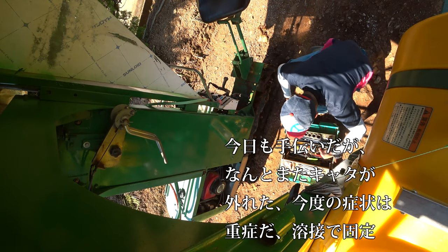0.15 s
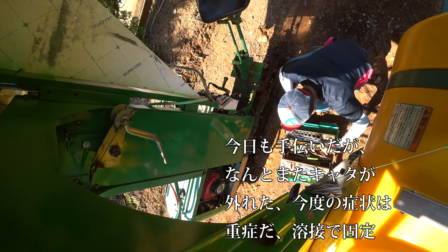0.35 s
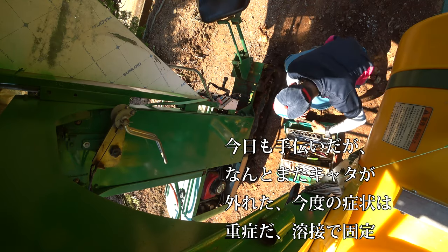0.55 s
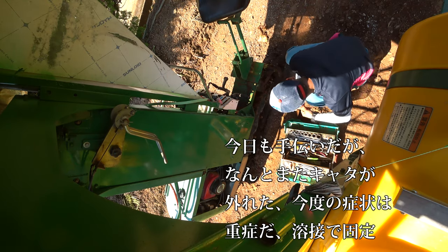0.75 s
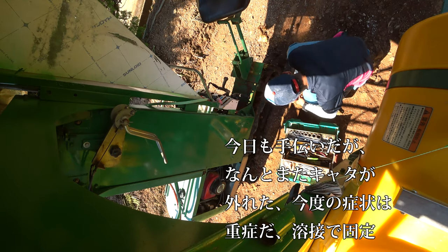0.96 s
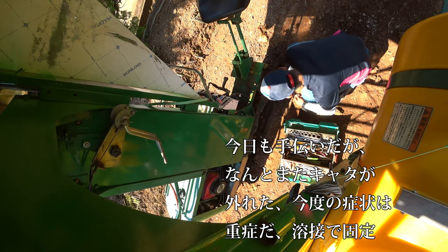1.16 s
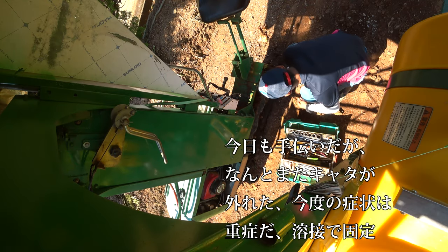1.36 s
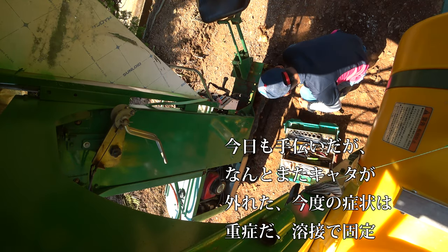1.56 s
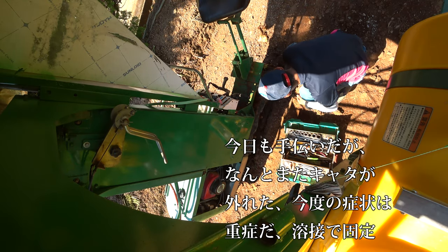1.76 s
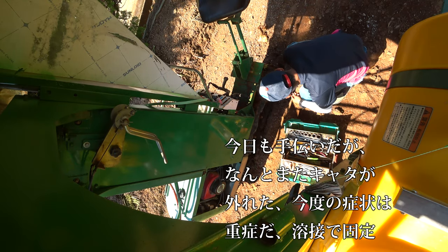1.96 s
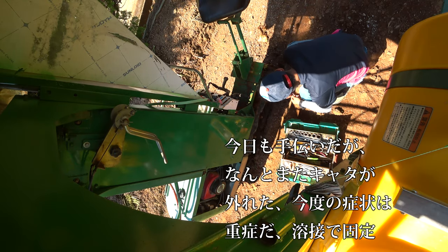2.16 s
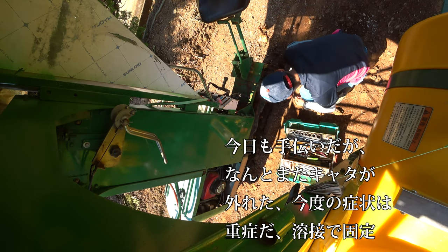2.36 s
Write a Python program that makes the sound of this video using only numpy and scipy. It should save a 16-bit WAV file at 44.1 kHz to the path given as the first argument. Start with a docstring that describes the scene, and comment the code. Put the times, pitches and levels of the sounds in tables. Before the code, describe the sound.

Close up outdoors, a hand stirs wrenches and sockets with quick clinks and a sharp clash, then pauses; cloth brushes softly, a tool bangs the box, and later another knocks it, over faint air and tiny chirps.

```python
"""Rummaging in a steel toolbox

A hand rummages outdoors: wrenches and sockets clink and rattle, two wrenches clash hard, later tools drop
against the box. Between them sleeves rustle over quiet farm air and a few faint chirps.
Struck metal is made of fading sine tones; clatter, cloth and air are shaped noise (clatter adds tiny pings).
"""
import sys
import numpy as np
from scipy import signal
from scipy.fft import rfft, irfft
from scipy.io import wavfile
from scipy.ndimage import uniform_filter1d, minimum_filter1d

SR = 44100
rng = np.random.default_rng(int(sys.argv[2]) if len(sys.argv) > 2 else 0)


def digitize_waveform(pressure):
    """Quantize a signal to 16-bit integers and store it at the path in sys.argv[1].

    Rows of a 2-D input are taken as channels; values are limited to [-1, 1].
    """
    field = np.atleast_2d(pressure).T
    bounded = np.clip(field, -1, 1)
    quanta = np.round(bounded * 32767).astype(np.int16)
    wavfile.write(sys.argv[1], SR, quanta)


N = 110250  # samples, 2.5 s


def undb(db):
    """Turn dB into a gain."""
    return 10 ** (np.asarray(db) / 20)


def table(rows, hz):
    """Read (Hz, value) rows at any pitch, on a log pitch axis."""
    rows = np.array(rows, float)
    return np.interp(np.log(hz + 1), np.log(rows[:, 0] + 1), rows[:, 1])


def unit(x):
    """Scale to an rms of 1."""
    return x / np.sqrt(np.mean(x ** 2))


def coloured(x, rows):
    """Shape the spectrum by (Hz, dB) rows, then scale to an rms of 1."""
    gain = undb(table(rows, np.fft.rfftfreq(N, 1 / SR)))
    return unit(irfft(rfft(x) * gain, N))


def clock(length):
    """Sample times in seconds, from 0 up to a length."""
    return np.arange(int(length * SR)) / SR


def add(out, start, x):
    """Mix x in at a start time in seconds, cutting it at the end of the scene."""
    i = int(start * SR)
    out[i:i + len(x)] += x[:N - i]


def fall(t, t60):
    """Exponential decay that drops 60 dB in t60 seconds."""
    return np.exp(-np.log(1000) * t / t60)


DAMPED_T60_S = 0.028


def touch(t, rise, free):
    """A contact swells, the metal rings, then a neighbour damps it."""
    return np.clip(t / max(rise, 1e-4), 0, 1) * fall(np.maximum(t - free, 0), DAMPED_T60_S)


# Colour of the air. Each row: pitch in Hz, level in dB.
AIR_COLOUR = [(15, -53.5), (25, -20.5), (200, -10.5), (236, -9.5), (591, -4), (677, -2.5), (1560, -3.5),
              (2050, -8.5), (2610, -9.5), (11000, -16), (16000, -16.5)]
# Difference between the ports. Each row: pitch in Hz, side level minus mid level in dB.
AIR_SIDE = [(60, -2.5), (110, -10.5), (200, -2), (380, 2), (700, 4), (1290, 3.5), (2380, 6), (4400, -1),
            (8120, -4.5), (15000, -2.5)]
AIR_DB = -56.5
AIR_FLICKER_DB, AIR_FLICKER_S = 1.5, .03  # rms flicker, and length of each of two smoothings


def air():
    """Quiet outdoor noise, partly shared by both ports; six pitch bands flicker separately."""
    hz, out = np.fft.rfftfreq(N, 1 / SR), 0
    mid, side = rfft(rng.standard_normal((2, N))) * undb(table(AIR_COLOUR, hz))
    side = side * undb(table(AIR_SIDE, hz))
    ports = np.array([mid + side, mid - side])
    # band 0 is all below 500 Hz, bands 1 to 4 are octaves, band 5 is all above 8000 Hz
    band = np.clip(np.floor(np.log2(hz / 250 + 1e-9)), 0, 5)
    size = int(AIR_FLICKER_S * SR)
    for k in range(6):
        slow = uniform_filter1d(uniform_filter1d(rng.standard_normal(N), size), size)
        out = out + irfft(ports * (band == k), N) * undb(AIR_FLICKER_DB * unit(slow))
    return out * undb(AIR_DB) / np.std(out.mean(axis=0))


# Each row: start in seconds, first pitch in Hz, last pitch in Hz, level in dB, length in seconds.
CHIRPS = [(0.548, 2073, 2250, -58, 0.037), (0.745, 1986, 1944, -57, 0.022), (0.868, 2200, 1926, -54, 0.041),
          (1.012, 2030, 1860, -58, 0.035), (1.371, 3950, 4760, -50, 0.023), (1.386, 4530, 3650, -54, 0.016),
          (1.932, 3580, 4800, -55.5, 0.016)]


def chirps():
    """Faint gliding tones, broken up by a fast random flicker of level."""
    out = np.zeros(N)
    for start, first_hz, last_hz, level_db, length in CHIRPS:
        n = int(length * SR)
        cycles = np.cumsum(np.linspace(first_hz, last_hz, n)) / SR
        add(out, start, undb(level_db) * np.hanning(n) ** .5 * np.sin(2 * np.pi * cycles))
    flicker_db = 4.4 * unit(uniform_filter1d(rng.standard_normal(N), size=130))
    return out * undb(flicker_db)


# Brushes of cloth. Each row: middle in seconds, level in dB, length in seconds.
RUSTLE = [(.87, -59, 0.13), (1.141, -55, 0.15), (1.21, -55, .14), (1.33, -57.5, 0.067), (1.854, -55, 0.062),
          (1.928, -58, 0.069), (2.04, -58.5, 0.043), (2.287, -55.5, 0.025), (2.477, -61.5, 0.076)]
RUSTLE_HZ, RUSTLE_WIDTH_HZ = 3320, 4200  # centre and width of the filter, which is used twice


def rustle():
    """Sleeves brushing: grainy noise in a broad band, swelling and fading smoothly."""
    grain_db = 1.9 * unit(uniform_filter1d(rng.standard_normal(N), 150))
    grains = rng.standard_normal((2, N)) * undb(grain_db)
    b, a = signal.iirpeak(RUSTLE_HZ, RUSTLE_HZ / RUSTLE_WIDTH_HZ, SR)
    cloth = unit(signal.lfilter(b, a, signal.lfilter(b, a, grains)))
    t, power = np.arange(N) / SR, np.zeros(N)
    for middle, level_db, length in RUSTLE:
        power += undb(2 * level_db) * np.exp(-(2 * (t - middle) / length) ** 2)
    return cloth * np.sqrt(power)


# Low thumps under the hard clash and under a later blow. Each row: start in seconds, level in dB.
THUMPS = [(0.31, -59.5), (.350, -51), (1.42, -62)]
THUMP_HZ, THUMP_T60_S = 150, 0.067  # top of the noise band, decay time


def thumps():
    """Short dull bursts of bass noise, partly different at the two ports."""
    env, t = np.zeros(N), clock(.15)
    for start, level_db in THUMPS:
        add(env, start, undb(level_db) * np.minimum(t / 0.00818, 1) * fall(t, THUMP_T60_S))
    bass = signal.butter(2, [THUMP_HZ / 4, THUMP_HZ], "band", fs=SR, output="sos")
    mid, side = signal.sosfilt(bass, rng.standard_normal((2, N)))
    return unit(np.array([mid + .5 * side, mid - .5 * side])) * env


STRIKE_SCATTER_DB = 2


def struck(mode_hz, modes, hits):
    """Each strike wakes the same modes (ringing tones), nearly in step, with fresh strengths."""
    out, hz = np.zeros(N), np.array(mode_hz)[:, None]
    mode_db, t60 = np.array(modes, float).T[:, :, None]
    for start, level_db, rise, free, tilt in hits:
        t = clock(free + .05)
        chance = rng.standard_normal((2, len(hz), 1))
        tilt_db = tilt * np.log2(hz / hz[0])
        gain = undb(level_db + mode_db + tilt_db + STRIKE_SCATTER_DB * chance[0])
        # counting phase from the scene's start keeps strikes in step, give or take .5 radian
        phase = 2 * np.pi * hz * (t + int(start * SR) / SR) + .5 * chance[1]
        ringing = (gain * fall(t, t60) * np.sin(phase)).sum(axis=0)
        add(out, start, touch(t, rise, free) * ringing)
    return out


# Ringing tones of the box: pitches in Hz.
BOX_HZ = [516, 625, 730, 816, 900, 1000, 1140, 1230, 1435, 1700, 2150, 2850, 3290, 3650, 4070, 4334, 5050]
# Each row, in the order of the pitches: level in dB, time to fall 60 dB in seconds.
BOX_MODES = [(-10, 0.12), (-11.5, 0.13), (-10.5, 0.18), (-25.5, 0.82), (-13.5, 0.12), (-15.5, 0.055),
             (-17, 0.097), (-18.5, .1), (-15.5, 0.15), (-14.5, 0.11), (-24.5, 0.13), (-12, 0.069),
             (-16.5, 0.033), (-10, 0.0377), (-13.5, 0.089), (-16, .1), (-19.5, 0.077)]
# Each row: start in seconds, level in dB, rise in seconds, free ringing in seconds, tilt in dB per octave.
BOX_HITS = [(0.015, -28, 0.0068, 0.063, -26), (0.045, -27.5, 0.0005, .2, -3),
            (0.072, -31.5, 0.00061, 0.2316, 3.5), (.095, -30, 0.00072, 0.25, 1.5),
            (0.144, -48, 0.01, 0.203, 10), (.172, -30.5, 0.00085, 0.15, 1), (.205, -36, 0.00061, 0.41, 2.5),
            (0.224, -30, 0.0028, 0.1864, 1), (0.25, -27.5, 0.00058, 0.062, 0),
            (0.269, -24.5, 0.00093, 0.03, 1.5), (0.312, -36, 0.0075, 0.027, -7.5),
            (0.362, -34, 0.0029, 0.031, 7), (0.376, -37.5, 0.0012, 0.027, -2),
            (0.402, -35, 0.0024, 0.095, 3.5), (1.392, -18, 0.0011, 0.025, 0.5),
            (1.423, -16, 0.0011, 0.32, -4), (1.433, -30, 0.0016, 0.25, -2.5),
            (1.743, -48, 0.0017, 0.072, -6), (2.206, -36, 0.00063, 0.034, -2),
            (2.352, -26, 0.00091, 0.017, 2.5), (2.375, -23.5, 0.00071, .3, -1.5),
            (2.443, -39.5, 0.0041, 0.075, -4.5)]


def box_ringing():
    """The steel box sounds its separate modes at each blow."""
    return struck(BOX_HZ, BOX_MODES, BOX_HITS)


# Colour of the noise of a blow on the box. Each row: pitch in Hz, level in dB.
CRACK_COLOUR = [(120, -57), (200, -16.5), (424, -22.5), (500, -9.5), (647, 1.5), (1450, -9), (2510, -23),
                (2750, -12.5), (3560, -9.5), (4770, -19), (16000, -50.5)]
CRACK_DB, CRACK_SPLIT_HZ = -2.5, 2600
CRACK_LOW_T60_S, CRACK_HIGH_T60_S = .12, 0.098


def cracks():
    """The panels' many close modes: a coloured noise tail after each blow, the treble dying first."""
    low_power, high_power, t = np.zeros(N), np.zeros(N), clock(.3)
    noise = coloured(rng.standard_normal(N), CRACK_COLOUR)
    low = signal.sosfiltfilt(signal.butter(4, CRACK_SPLIT_HZ, fs=SR, output="sos"), noise)
    for start, level_db, rise, free, tilt in BOX_HITS:
        contact = undb(level_db) * touch(t, rise, free)
        add(low_power, start, (contact * fall(t, CRACK_LOW_T60_S)) ** 2)
        add(high_power, start, (contact * undb(1.7 * tilt) * fall(t, CRACK_HIGH_T60_S)) ** 2)
    return undb(CRACK_DB) * (low * np.sqrt(low_power) + (noise - low) * np.sqrt(high_power))


# Bursts of clatter in the heap. Each row: start in seconds, level in dB, rise in seconds, length in seconds.
RATTLE = [(0, -35.5, 0.00033, 0.012), (0.0106, -35, 0.0005, 0.0096), (0.026, -36.5, .001, .016),
          (0.04, -38, 0.0062, 0.048), (0.076, -25.5, 0.0032, 0.0043), (0.087, -27.5, 0.00067, 0.0062),
          (0.104, -43, .002, 0.029), (0.139, -35.5, 0.002, 0.022), (0.162, -32.5, 0.0052, 0.014),
          (0.185, -32, 0.00179, 0.011), (0.197, -33.5, 0.0049, .014), (0.214, -27.5, .006, .015),
          (0.237, -32.5, 0.0031, 0.009), (0.25, -31, 0.0013, 0.02), (0.27, -27, .003, 0.0046),
          (0.278, -40.5, 0.0028, 0.03), (0.309, -29, .001, 0.0066), (0.313, -40.5, 0.0026, 0.0097),
          (0.333, -38, 0.0023, 0.017), (0.346, -30, .002, 0.0058), (0.357, -20.5, 0.0011, 0.0064),
          (0.371, -30, 0.0014, 0.017), (0.396, -35, 0.0011, 0.011), (0.412, -53, .001, 0.018)]
# Colour of the clatter. Each row: pitch in Hz, level in dB.
RATTLE_COLOUR = [(180, -49), (300, -12.5), (774, 3), (1840, -5.5), (2170, 0), (3290, -6), (4230, -1),
                 (6200, 2.5), (7570, -5.5), (10600, -4), (16000, -17)]
PINGS_PER_S, PING_T60_S, PING_DB = 4500, .035, 4  # level is that of the pings over the clicks
RATTLE_SIZES_DB = 2.5  # sets the random boosts that make contacts uneven


def rattle():
    """A dense swarm of tiny contacts: uneven clicks, and short random modes that they ring."""
    pings, t, end = np.zeros(N), clock(PING_T60_S), .5
    for when, pitch, size in rng.random((8000, 3)):
        start = when * 8000 / PINGS_PER_S
        if start < end:
            gain = undb(-RATTLE_SIZES_DB * np.log(1 - size))
            tone = np.sin(2 * np.pi * (300 + 15500 * pitch) * t)
            add(pings, start, gain * fall(t, PING_T60_S) * tone)
    boost_db = RATTLE_SIZES_DB * np.minimum(rng.exponential(size=N), 4)
    clicks = rng.standard_normal(N) * undb(boost_db)
    power = np.zeros(N)
    for start, level_db, rise, length in RATTLE:
        add(power, start, (undb(level_db) * touch(clock(length + .05), rise, length)) ** 2)
    swarm = undb(PING_DB) * pings / np.std(pings[:int(end * SR)]) + unit(clicks)
    return coloured(swarm, RATTLE_COLOUR) * np.sqrt(power)


# Single short tones. Each row: start in seconds, pitch in Hz, level in dB, free ringing in seconds.
TINKS = [(.013, 7700, -23.5, 0.0082), (.041, 5490, -26.5, 0.022), (.045, 6830, -23.5, 0.023),
         (.077, 4390, -25.5, 0.014), (.171, 3067, -29.5, 0.032), (.180, 4520, -33, 0.018),
         (.194, 10800, -34, 0.011), (.205, 8300, -26, 0.018), (.220, 4330, -22, 0.0099),
         (.221, 6300, -22.5, 0.0075), (.254, 6100, -24, 0.0067), (.268, 6310, -27, 0.0071),
         (.269, 8100, -26.5, .005), (2.063, 4306, -50.5, 0.083), (.46, 1420, -55, 0.066),
         (.675, 4480, -57.5, 0.0088), (1.16, 1145, -50, 0.017), (2.206, 4290, -49, 0.027),
         (2.206, 2155, -43.5, 0.029), (2.206, 1682, -39, 0.012), (2.351, 945, -19, 0.004),
         (1.393, 1702, -33, 0.012), (1.424, 1182, -25, .016), (1.424, 621, -26.5, 0.026),
         (1.429, 303, -39.5, 0.055), (2.206, 5120, -53.5, .02), (2.206, 620.5, -44.5, 0.044),
         (2.351, 1170, -23, 0.019), (2.351, 3303, -22.5, 0.007), (1.393, 615, -18.5, 0.023),
         (.319, 3870, -16, 0.005), (.143, 2248, -24, .018), (.268, 979, -21, 0.0088),
         (2.445, 2195, -48.5, 0.016)]
TINK_T60_S = 0.08  # shortest decay time before damping


def tinks():
    """Single short sine tones: small clinks, faint ticks, and extra tones of blows on the box."""
    out = np.zeros(N)
    for start, hz, level_db, free in TINKS:
        t = clock(free + .05)
        tone = fall(t, max(TINK_T60_S, 4 * free)) * np.sin(2 * np.pi * hz * t)
        add(out, start, undb(level_db) * touch(t, 0.0011, free) * tone)
    return out


# Ringing tones of a big socket: pitches in Hz.
SOCKET_HZ = [2170, 2573, 4113, 4344, 6783, 8500, 9313, 10790]
# Each row, in the order of the pitches: level in dB, time to fall 60 dB in seconds.
SOCKET_MODES = [(-0.5, 0.074), (-11, 0.12), (-5, 0.101), (-3.5, .03), (8, .06), (-13.5, 0.037),
                (-2.5, 0.054), (2.5, .11)]
# Each row: start in seconds, level in dB, rise in seconds, free ringing in seconds, tilt in dB per octave.
SOCKET_HITS = [(0.141, -25, 0.0016, 0.072, -3), (0.214, -28, .002, 0.027, 0)]


def big_socket():
    """A big socket rings its own modes when knocked."""
    return struck(SOCKET_HZ, SOCKET_MODES, SOCKET_HITS)


# Ringing tones of the long and the short wrench: pitches in Hz.
LONG_HZ = [3770, 6300, 6445, 6560, 9995, 10100, 10760, 11620, 12990, 14710, 15470]
SHORT_HZ = [4274, 5206, 6510, 6852, 8323, 9328, 10256, 10855, 12040, 12765, 13560, 15470]
# Each row, in the order of the pitches: level in dB, time to fall 60 dB in seconds.
LONG_MODES = [(-15.5, 0.11), (-15.5, 0.18), (-8, .12), (-15.5, 0.089), (-8.5, 0.1), (0, 0.26), (-24, 0.24),
              (-24, 0.091), (-24, 0.13), (-16.5, 0.34), (-24, .2)]
SHORT_MODES = [(-19.5, .1), (-3, 0.059), (-14, 0.098), (-0.5, 0.0866), (-12.5, 0.13), (-1, 0.064),
               (-1, 0.051), (-17.5, 0.078), (-14.5, .4), (-12.5, 0.081), (-15, 0.11), (-12.5, .15)]
# Each row: start in seconds, level in dB, rise in seconds, free ringing in seconds, tilt in dB per octave.
LONG_HITS = [(0.039, -21.5, 0.0045, 0.019, -4), (0.089, -17.5, 0.00079, 0.0072, -8),
             (0.311, -15, 0.0011, 0.009, 1.5), (0.318, -14, 0.0012, 0.0045, 6.5),
             (0.323, -9, 0.005, 0.007, 6.5), (.336, -15, 0.0035, 0.0043, 3.5),
             (0.348, -19, 0.0018, .008, -9), (0.362, -11, 0.0011, 0.029, -2), (0.376, -20, 0.0025, .028, 1),
             (.405, -45, 0.0033, 0.05, 2)]
SHORT_HITS = [(0.083, -25, .001, 0.025, -13), (0.219, -29, 0.002008, 0.0085, 1.5),
              (0.36, -5.5, 0.00067, 0.03, -3.5), (0.377, -21.5, .001, 0.019, -1),
              (.404, -38.5, 0.0028, 0.034, 0.5)]


def wrenches():
    """Two wrenches clink and clash, each ringing its own modes."""
    return struck(LONG_HZ, LONG_MODES, LONG_HITS) + struck(SHORT_HZ, SHORT_MODES, SHORT_HITS)


# Colour of the dense high modes of the wrenches. Each row: pitch in Hz, level in dB.
CRASH_COLOUR = [(2500, -17), (4500, -6.5), (6500, 0), (8500, -9.5), (10500, 1.5), (13000, -4),
                (16000, -10.5)]
CRASH_DB = -13


def crash():
    """Under each wrench strike, bright noise stands for modes too close to tell apart."""
    power = np.zeros(N)
    for start, level_db, rise, free, tilt in LONG_HITS + SHORT_HITS:
        contact = touch(clock(free + .05), rise, free)
        add(power, start, (undb(level_db + tilt) * contact) ** 2)
    return undb(CRASH_DB) * coloured(rng.standard_normal(N), CRASH_COLOUR) * np.sqrt(power)


ECHO_DB, ECHO_T60_S = -13, .1


def placed(x, phase, balance):
    """Two ports hear a source with their own phase and level, plus short echoes off nearby machines."""
    hz, sign = np.fft.rfftfreq(N, 1 / SR), np.array([[.5], [-.5]])  # each port takes half the difference
    lead = np.interp(hz, *np.array(phase).T)
    direct = irfft(rfft(x) * undb(sign * table(balance, hz)) * np.exp(1j * sign * lead), N)
    t = clock(.3)
    tail = rng.standard_normal((2, len(t))) * fall(t, ECHO_T60_S) * (t > .004)
    tail = tail / np.sqrt(np.sum(tail ** 2, axis=1, keepdims=True))
    return direct + undb(ECHO_DB) * signal.fftconvolve(x[None], tail, axes=1)[:, :N]


# How the two microphone ports hear the tools and the box.
# Each row: pitch in Hz, lead of the left port in radians.
TOOL_PHASE = [(0, -1.1), (4390, -0.47), (6030, -0.1), (7410, -0.82), (7750, -0.2), (8350, 0.81), (9040, 1),
              (10100, 0.8), (10900, 0.15), (12600, -0.24), (13600, -0.736), (14500, -1), (15400, -1.2),
              (16000, -0.19)]
BOX_PHASE = [(0, 0.94), (1460, 0.6), (1890, -1.8), (2410, 0.5), (3790, 0.038), (4740, 0.065), (7490, 0.4),
             (9390, 1), (12800, 0), (16000, -0.38)]
# Each row: pitch in Hz, left level minus right level in dB.
TOOL_BALANCE = [(60, 4.5), (110, 2), (200, 20.5), (380, 7.5), (700, 6.5), (1290, 1), (2380, -1),
                (4400, -0.5), (8120, -0.5), (15000, 2.5)]
BOX_BALANCE = [(60, 4.5), (110, 4.12), (200, 4.0), (380, 1.5), (700, 1.9), (1290, 2.5), (2380, 0.83),
               (4400, 1.05), (8120, 0.5), (15000, 1.0)]
BASS_CUT_HZ = 380


def metal():
    """Place the tools and the box; a high-pass filter thins the lows of both."""
    small, late = tinks(), np.arange(N) > SR  # after the first second these tones belong to blows on the box
    tools = wrenches() + big_socket() + crash() + small * ~late + rattle()
    box = box_ringing() + cracks() + small * late
    both = placed(tools, TOOL_PHASE, TOOL_BALANCE) + placed(box, BOX_PHASE, BOX_BALANCE)
    return signal.sosfilt(signal.butter(3, BASS_CUT_HZ, "high", fs=SR, output="sos"), both)


def scene():
    """Quiet surroundings, cloth and thumps under the clatter of metal."""
    return air() + chirps() + rustle() + thumps() + metal()


TOP_HZ = 15850


def record(dry):
    """A fast limiter holds the peaks just under full scale; then the top is cut steeply."""
    room = np.minimum(.93 / (np.abs(dry).max(axis=0) + 1e-9), 1)
    gain = uniform_filter1d(minimum_filter1d(room, size=89), size=45)  # sizes in samples
    return signal.sosfilt(signal.ellip(12, .2, 85, TOP_HZ, fs=SR, output="sos"), dry * gain)


dry = scene()
out = record(dry)
digitize_waveform(out)
```